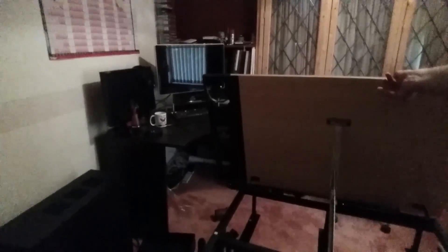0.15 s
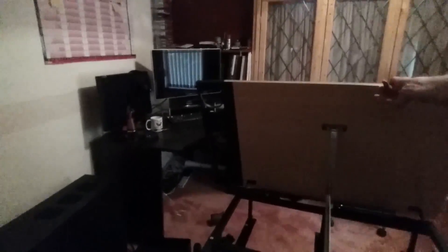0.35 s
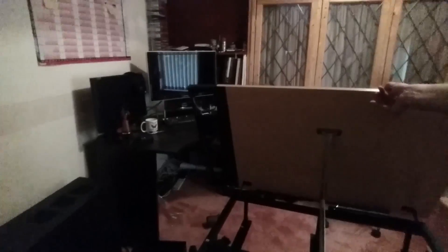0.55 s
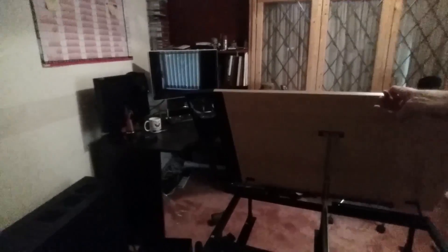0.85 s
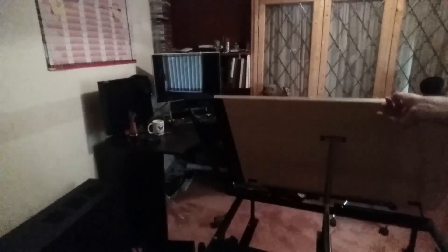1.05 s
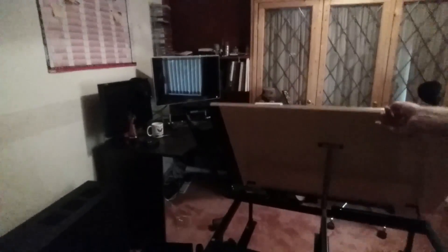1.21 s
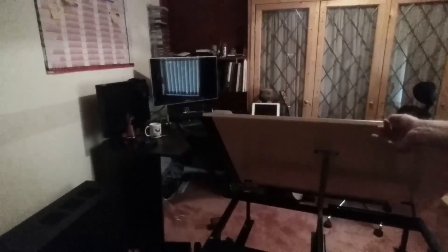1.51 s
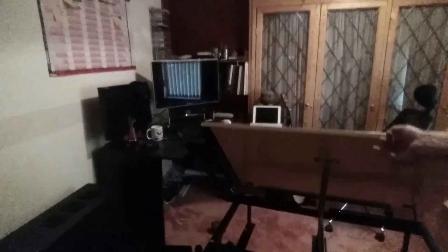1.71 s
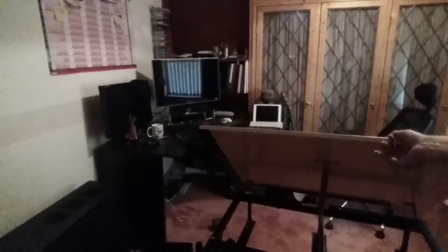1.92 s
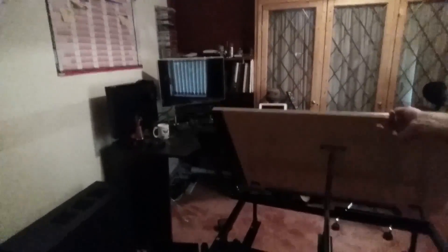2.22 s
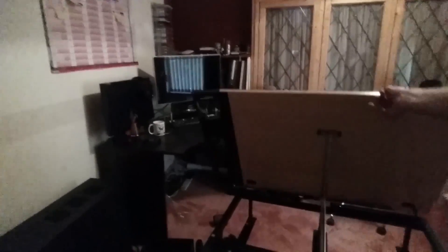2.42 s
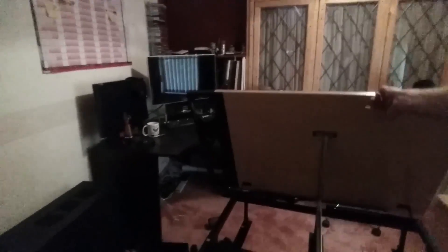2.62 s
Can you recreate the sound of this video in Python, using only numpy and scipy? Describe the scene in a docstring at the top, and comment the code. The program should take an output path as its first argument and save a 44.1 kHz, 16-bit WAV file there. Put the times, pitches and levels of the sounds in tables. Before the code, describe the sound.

Faint metal ticking, then four loud ratchet clacks as a hinged wooden board is raised indoors

```python
"""In a small room, a tilting desk top is eased back by hand, its metal stay ticking and scraping faintly.
Then it is raised and the pawl snaps over four ratchet teeth; the steel rings and the board booms.
Under it lie a quiet room hum and soft low bumps, mostly on the left of the microphone.
Impacts are noise bursts, filtered and dying away band by band, joined by decaying modes of steel and wood;
rubbing, rumble and hum are steady coloured noises whose level drifts."""
import sys
import numpy as np
from scipy import signal
from scipy.fft import rfft, irfft
from scipy.io import wavfile

SR = 44100
rng = np.random.default_rng(int(sys.argv[2]) if len(sys.argv) > 2 else 0)


def wrap_up_sound(samples):
    """Save the sound to the file named by the first command line argument, as 16-bit audio."""
    columns = np.atleast_2d(samples).T
    # keep every value between -1 and 1, then stretch to whole-number steps
    tamed = np.clip(columns, -1, 1)
    steps = np.round(tamed * 32767).astype(np.int16)
    wavfile.write(sys.argv[1], SR, steps)


N = 121275
BLOW_T = np.arange(SR * 3 // 4) / SR  # time within one blow, s
GRAIN_DB = 2.7  # random unevenness of the single reflections

# Relative spectrum of a pawl snap. Each row: frequency in Hz, spectral density in dB per Hz.
SNAP_SPECTRUM = [(40, -13), (130, -7.5), (200, 1), (300, 0), (450, -9), (650, -7.5), (1000, 0), (1500, -4),
                 (2400, 5.5), (4000, 0.5), (6000, 1.5), (8700, 2), (9400, -6), (10200, -4.5), (12000, -5),
                 (14000, 1.5), (15500, -0.5), (16000, -7.5)]
# Ranges in which one blow differs from the next. Each row: frequency in Hz, share of the change from 0 to 1.
BASS_RANGE = [(350, 1), (1500, 0)]
CLANK_RANGE = [(1200, 0), (2100, 1), (3300, 1), (4600, 0)]
TREBLE_RANGE = [(3000, 0), (5500, 1)]
# Likeness of the two ports. Each row: frequency in Hz, left-right correlation from -1 to 1.
LIKENESS = [(100, 0.77), (270, 0.87), (600, 0.57), (1100, 0.027), (2300, -0.29), (5000, 0.16),
            (15000, -0.09)]


def ratchet():
    """Impact excitation: four snaps; on the last the top rests with a knock and the pawl seats with a clack."""
    # Each row: start in seconds, level in dB, then bass, wood, clank, treble, first crack, ratchet ring
    # and pawl ping in dB, tail length as a factor.
    snaps = [(2.1273, -23, -0.5, -2.5, -1, -4, -18, -19, -9, 1.35),
             (2.2590, -17.5, -4.5, 1.5, -2.5, -1.5, -6, -16, -20, 1.31),
             (2.3636, -21.5, 0, 2.5, 0.5, 0.5, 1.5, -11, -30, 0.92),
             (2.4769, -22.5, 0.5, 0, 3.5, 0.5, 3.5, -8, -25, 0.81)]
    seat_hz, seat_db, seat_t60_s = 788, -30, 0.082
    rebound_s, rebound_db, rebound_t60_s = 2.4905, -20.5, 0.03
    out = np.zeros((2, N))
    for start_s, *blow in snaps:
        add(out, start_s, snap(*blow))

    last_s = snaps[-1][0]
    wooden_knock = ring([(seat_hz, seat_db, seat_t60_s)]) * np.minimum(BLOW_T / 0.002, 1)
    add(out, last_s, wooden_knock)

    # the pawl drops home after the last tooth
    clack = noise(SNAP_SPECTRUM, len(BLOW_T), [(CLANK_RANGE, 8), (TREBLE_RANGE, -4)])
    add(out, rebound_s, amp(rebound_db) * clack * decay(BLOW_T, rebound_t60_s))
    return out


def snap(level_db, bass_db, wood_db, clank_db, treble_db, crack_db, ring_db, ping_db, length):
    """Modal response to an impact: a crack, the room's answer, ringing steel and a boom of the board."""
    # Modes of the toothed steel rack, the pawl and the board.
    # Each row: frequency in Hz, relative level in dB, t60 in seconds.
    rack_modes = [(2165, -1, .22), (2365, -4, .3), (2540, -5, .27), (2735, -2, .22), (2965, -4, .3),
                  (3232, -5, .36), (3290, -2, .22), (4342, -1, .2), (4468, -4, .2), (5635, -6, .4),
                  (5678, -4, .25), (5846, -12, .52), (6165, -4, .28), (6255, -15, .55), (6315, -14, .52)]
    pawl_modes = [(7790, -6, .17), (7832, -2, .21), (7885, -4, .16), (8735, -5, .17), (13500, -8, .2),
                  (13700, -8, .18), (14480, -10, .2), (14660, -8, .18)]
    board_modes = [(190, -2, 0.5), (220.4, -3, 0.44), (252.8, -0.5, 0.37), (293.2, -6, 0.53),
                   (937, -8, 0.4), (990, -4, 0.3), (1132, -8, 0.23)]
    # Range of the wood sound. Each row: frequency in Hz, share of the change from 0 to 1.
    wood_range = [(400, 0), (650, 1), (1150, 1), (1600, 0)]
    rise_s, crack_s, board_rise_s, board_db = 0.00063, 0.0054, 0.0049, -17.5

    shelves = [(BASS_RANGE, bass_db), (wood_range, wood_db), (CLANK_RANGE, clank_db), (TREBLE_RANGE, treble_db)]
    burst = noise(SNAP_SPECTRUM, len(BLOW_T), shelves, grain_db=GRAIN_DB, resonant=1)
    crack = amp(crack_db) * np.exp(-(BLOW_T / crack_s) ** 2)
    burst = die_away(burst, length) * np.sqrt(1 + crack ** 2)

    boom = amp(board_db + bass_db) * ring(board_modes) * (1 - np.exp(-BLOW_T / board_rise_s))
    steel = amp(ring_db) * ring(rack_modes) + amp(ping_db) * ring(pawl_modes)
    return amp(level_db) * (burst + steel + boom) * np.minimum(BLOW_T / rise_s, 1)


def stay():
    """Friction and stick-slip: the stay rubs faintly, the board rumbles, and the stay catches in light ticks."""
    # Light ticks of the stay. Each row: start in seconds, level in dB, bass, clank and treble in dB,
    # rise in seconds, tail length as a factor.
    ticks = [(.265, -65, 6.5, 0.5, -22, 0.0028, 1.4), (.292, -59, 3, 0, -20, .018, .9),
             (.553, -77.5, 3, 4, -13, .003, 0.76), (.830, -69, 3, 0.5, -8, .004, 1),
             (1.111, -70.5, 10, 5.5, 3.5, .003, 1.1), (1.216, -65.5, -6, 4.5, -11, .002, 0.57),
             (1.511, -54, 4, 3.5, -3, .002, 1), (1.570, -54, 2.5, 1.5, -8, .003, 1.1),
             (1.607, -58, -2, 1, 2, 0.0016, 0.75), (1.638, -47, -12.5, 2, 4.5, 0.0026, 1.78),
             (1.657, -45, -9, -3, -3.5, 0.011, 1.34), (2.059, -53, 0, -0.5, 0, 0.00084, 1.15),
             (2.725, -55, -4, 5.5, 7, 0.011, 1.8)]
    # Modes of the stay. Each row: frequency in Hz, relative level in dB before the tick's treble change,
    # t60 in seconds before the tick's length factor.
    stay_modes = [(948, -3, .45), (1246, 1, .4), (1486, -2, .5), (1884, -3, .45), (2350, 0, .5),
                  (2622, -4, .4), (3165, -1, .45), (3381, -3, .4), (3763, -12, .45), (5394, -17, .45),
                  (6085, -20, .5), (6845, -21, .65), (7770, -18, .22)]
    # Relative spectra of tick and rub, and of the rumble. Each row: frequency in Hz, density in dB per Hz.
    tick_spectrum = [(40, -26.5), (130, -11), (230, 10), (550, -4), (1000, 2), (1600, -2.5), (2400, 0),
                     (3200, -9), (4200, -13.5), (8500, -20), (9600, -32), (12000, -33.5), (15000, -25)]
    rumble_spectrum = [(60, -9), (130, -1.5), (190, 2), (270, 0.5), (340, -2.5), (450, -9), (620, -12.5),
                       (1000, -17), (1600, -25.5), (8000, -60)]
    # Courses of the sliding stay and of the moving board. Each row: time in seconds, level in dB.
    slide_course = [(0, -81), (.27, -89), (.4, -78.5), (.75, -82), (1.0, -81.5), (1.25, -73), (1.4, -76),
                    (1.949, -71), (2.3, -81.5), (2.75, -59.5)]
    rumble_course = [(0, -83.5), (.55, -74), (.75, -66.5), (.98, -68), (1.1, -61.5), (1.4, -63.5),
                     (1.8, -59), (2.0, -63), (2.75, -60)]
    tick_ring_db = -10.5
    modes_above_db = -58  # ringing modes are added only to ticks above this level

    rub = noise(tick_spectrum, N, [(TREBLE_RANGE, -3)]) * level(slide_course)
    rumble = noise(rumble_spectrum, N) * level(rumble_course)
    out = rub + rumble
    for start_s, level_db, bass_db, clank_db, treble_db, rise_s, length in ticks:
        shelves = [(BASS_RANGE, bass_db), (CLANK_RANGE, clank_db), (TREBLE_RANGE, treble_db)]
        burst = noise(tick_spectrum, len(BLOW_T), shelves, grain_db=GRAIN_DB, resonant=0.84)
        tick = die_away(burst, length)
        if level_db > modes_above_db:
            modes = [(hz, db + treble_db * read(TREBLE_RANGE, hz), t60_s * length)
                     for hz, db, t60_s in stay_modes]
            tick += amp(tick_ring_db) * ring(modes)
        add(out, start_s, amp(level_db) * tick * np.minimum(BLOW_T / rise_s, 1))
    return out


def board_knocks():
    """Damped resonance: each dull knock is one decaying mode of the board with a short noisy puff."""
    # Each row: start in seconds, level in dB, pitch in Hz, t60 in seconds, noisy puff in dB relative to the mode.
    knocks = [(0.684, -52, 148, 0.15, -7), (1.08, -52, 168, 0.2, -10), (1.125, -51, 188, 0.4, -10),
              (1.217, -57, 250, .25, -8), (1.513, -48, 246.3, 0.27, -5), (1.572, -51, 180, .25, -10),
              (1.706, -45, 186.5, 0.43, -10.5), (2.006, -49, 356, 0.067, -1)]
    # Relative spectrum of the puff. Each row: frequency in Hz, spectral density in dB per Hz.
    puff_spectrum = [(60, -4), (200, 1.5), (400, -3), (600, -5.5), (900, -23), (2000, -32), (8000, -54)]
    puff_s, rise_s = 0.021, 0.0029
    out = np.zeros((2, N))
    for start_s, level_db, hz, t60_s, puff_db in knocks:
        puff = amp(puff_db) * noise(puff_spectrum, len(BLOW_T)) * np.exp(-BLOW_T / puff_s)
        knock = ring([(hz, 0, t60_s)]) + puff
        add(out, start_s, amp(level_db) * knock * np.minimum(BLOW_T / rise_s, 1))
    return out


def microphone_bumps():
    """Low-frequency pulses: each soft bump at the microphone is a low sine that swells and fades."""
    # Each row: start in seconds, level on the left in dB.
    bumps = [(.005, -38), (0.104, -40), (0.341, -34), (0.674, -38.5), (1.029, -39), (1.123, -39),
             (1.695, -40.5), (2.39, -38.5), (2.449, -40.5), (2.527, -35), (2.605, -37)]
    centre_hz, peak_s, right_db = 64, 0.014, -42  # right_db is relative to the left
    out = np.zeros((2, N))
    swell = (BLOW_T / peak_s) ** 2 * np.exp(2 * (1 - BLOW_T / peak_s))
    for start_s, level_db in bumps:
        hz = centre_hz * rng.uniform(0.886, 1.15)
        bump = swell * np.sin(2 * np.pi * (hz * BLOW_T + rng.random()))
        add(out, start_s, amp([[level_db], [level_db + right_db]]) * bump)
    return out


def hum():
    """Stationary coloured noise under slow amplitude modulation: low room noise that wavers a little."""
    # Relative spectrum of the hum. Each row: frequency in Hz, spectral density in dB per Hz.
    hum_spectrum = [(15, -19.5), (30, -3), (50, -4), (68, -1.5), (100, -6.5), (150, -13), (190, -15),
                    (250, -19.5), (300, -20.5), (400, -27.5), (550, -33), (800, -39), (1050, -37.5),
                    (1250, -31.5), (1400, -45), (1550, -60), (4000, -62), (16000, -70)]
    # Balance of the hum. Each row: frequency in Hz, left minus right in dB.
    hum_left = [(30, 5), (70, 21.5), (130, 0.5), (220, 1), (1000, 0.5), (8000, -2)]
    # Likeness of the hum's ports. Each row: frequency in Hz, left-right correlation.
    hum_likeness = [(60, 0), (150, 0.81), (400, 0.53), (1200, 0), (8000, 0.085)]
    mean_db, swell_db, swell_hz = -54.5, 1.44, 2.4
    swell = wander(np.arange(N) / SR, 1 / swell_hz)
    return amp(mean_db + swell_db * swell) * noise(hum_spectrum, N, same=hum_likeness, left=hum_left)


def ring(modes):
    """Modal superposition: decaying sines that waver in the room, less alike in phase where the field is diffuse."""
    waver, waver_s = 0.45, 0.022  # the room makes each ringing mode swell and dip
    out = np.zeros((2, len(BLOW_T)))
    coarse_t = BLOW_T[::100]
    phases = rng.uniform(-np.pi, np.pi, (len(modes), 2))
    for (hz, db, t60_s), (phase, apart) in zip(modes, phases):
        diffuse = np.clip(1 - read(LIKENESS, hz), 0, 1)
        turn = (2 * np.pi * hz * BLOW_T + phase).astype(np.float32)
        for port in range(2):
            swell = 1 + waver * diffuse * wander(coarse_t, waver_s)
            fade = amp(db) * decay(coarse_t, t60_s) * swell
            shift = np.float32(port * apart * diffuse)
            out[port] += np.interp(BLOW_T, coarse_t, fade) * np.sin(turn + shift)
    return out


def die_away(x, length):
    """Reverberant decay: after a short hold each band dies at its own speed over a faint lingering ring."""
    # Each row: frequency in Hz, t60 in seconds before the length factor.
    tail = [(200, 0.56), (600, 0.42), (1200, 0.41), (2600, 0.37), (5000, 0.34), (8000, 0.26), (11000, 0.3),
            (15000, 0.21)]
    hold_s = 0.015
    linger_db, linger_t60_s = -31, 0.79  # faint late ringing of the frame
    hz, t, spectrum = signal.stft(x, SR, nperseg=256)
    fade = decay(np.maximum(t - hold_s, 0), length * read(tail, hz)[:, None])
    linger = amp(linger_db) * decay(t, linger_t60_s)
    return signal.istft(spectrum * np.hypot(fade, linger), SR)[1][:, :len(BLOW_T)]


def noise(colour, size, shelves=(), same=LIKENESS, left=None, grain_db=0, resonant=0):
    """Spectral shaping of partly correlated stereo noise, near rms 1 before its ranges are raised or lowered."""
    # Usual balance. Each row: frequency in Hz, left minus right in dB.
    usual_left = [(200, -1), (600, 1), (1200, 3.5), (2500, 2.5), (6000, 0), (14000, 1.8)]
    # crowded resonances above the bass, different at each blow: depth in dB and spacing in Hz
    ripple_db, ripple_hz, fine_db, fine_hz = 2.1, 170, 2.0, 40
    hz = np.fft.rfftfreq(size, 1 / SR)
    white = rng.standard_normal((2, size)) * amp(grain_db * rng.standard_normal(size))
    first, second = rfft(white / white.std())

    gain = amp(read(colour, hz))
    ripple = ripple_db * wander(hz, ripple_hz) + fine_db * wander(hz, fine_hz)
    gain = gain * amp(resonant * (1 - read(BASS_RANGE, hz)) * ripple)
    gain = gain / np.sqrt(np.mean(gain ** 2))
    gain = gain * amp(sum(db * read(zone, hz) for zone, db in shelves))

    alike = np.clip(read(same, hz), -1, 1)
    lean = amp(read(usual_left if left is None else left, hz))
    right = alike * first + np.sqrt(1 - alike ** 2) * second
    ports = np.array([first * lean, right]) * np.sqrt(2 / (1 + lean ** 2))
    return irfft(ports * gain, size)


def decay(t, t60_s):
    """Exponential decay: the level falls by 60 dB in t60_s."""
    return np.exp(-np.log(1000) * t / t60_s)


def wander(x, step):
    """Random modulation: a curve along x, near rms 1, that turns about once a step."""
    knots = rng.standard_normal(1024) * np.sqrt(3 / 2)  # makes up for the rms lost between knots
    return np.interp(x / step, np.arange(len(knots)), knots)


def level(curve):
    """Level envelope: gain over the whole scene, interpolated in dB from rows of (s, dB)."""
    return amp(np.interp(np.arange(N) / SR, *np.transpose(curve)))


def amp(db):
    """Logarithmic level: decibels to amplitude gain."""
    return 10 ** (np.asarray(db) / 20)


def read(points, hz):
    """Logarithmic pitch scale: interpolates a table along log frequency."""
    f, value = np.transpose(points)
    return np.interp(np.log(hz + 1), np.log(f + 1), value)


def add(mix, start_s, sound):
    """Superposition: adds a stereo sound to the mix from start_s on."""
    part = mix[:, max(round(start_s * SR), 0):][:, :sound.shape[1]]
    part += sound[:, :part.shape[1]]


def scene():
    """Superposition of the desk's sounds, the bumps and the room."""
    return ratchet() + stay() + board_knocks() + microphone_bumps() + hum()


def record(dry):
    """Band limitation: a linear-phase low-pass filter removes what lies above the edge."""
    edge_hz = 16050
    low_pass = signal.firwin(255, edge_hz, window=("kaiser", 8), fs=SR)
    return signal.oaconvolve(dry, low_pass[None], "same")


dry = scene()
out = record(dry)
wrap_up_sound(out)
```